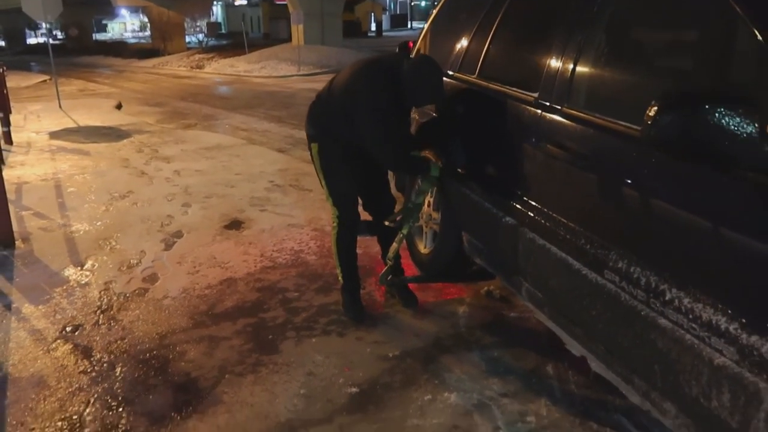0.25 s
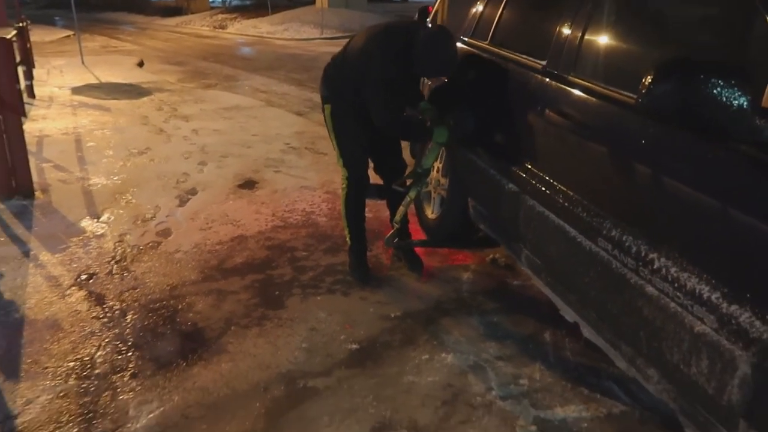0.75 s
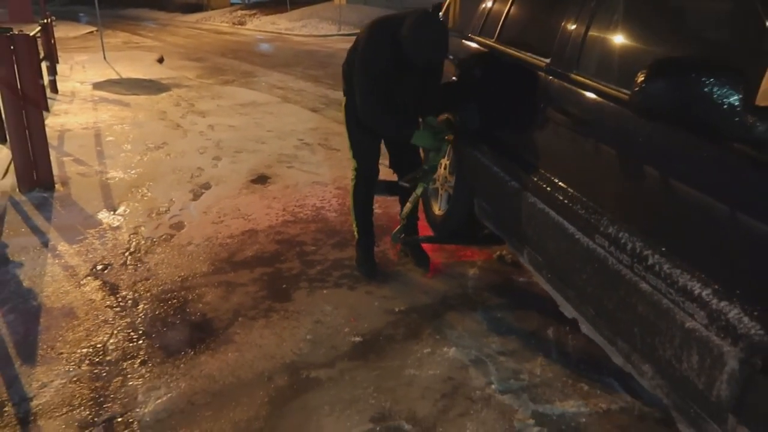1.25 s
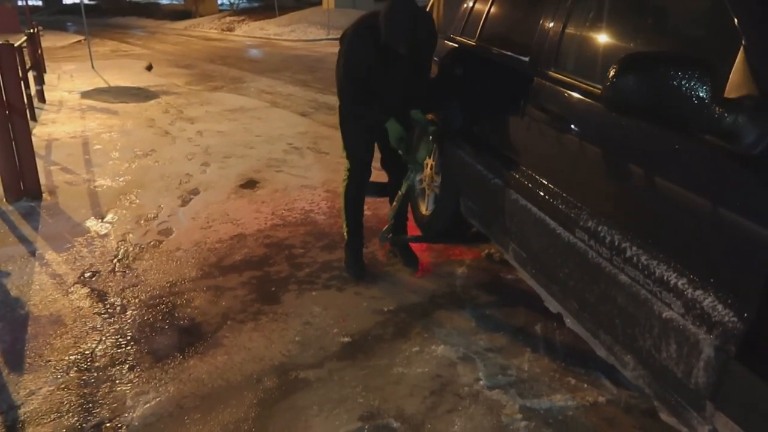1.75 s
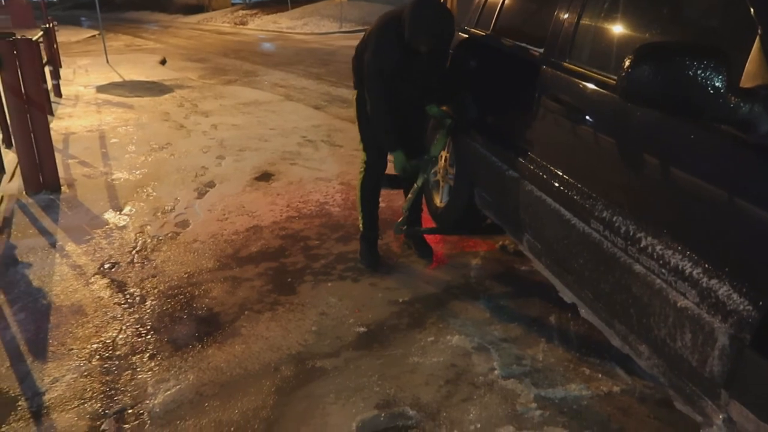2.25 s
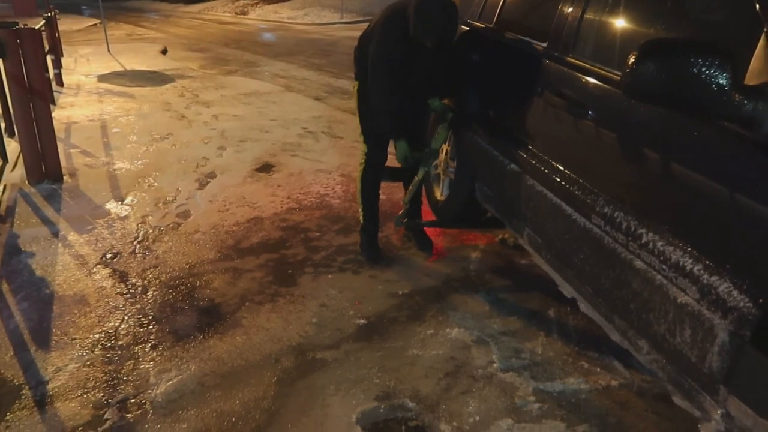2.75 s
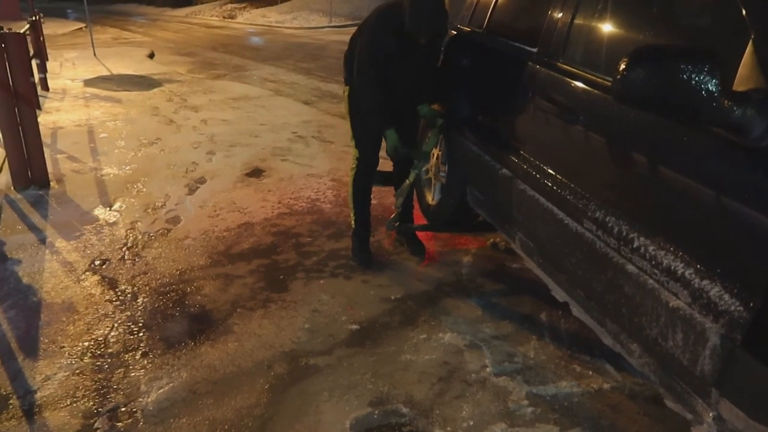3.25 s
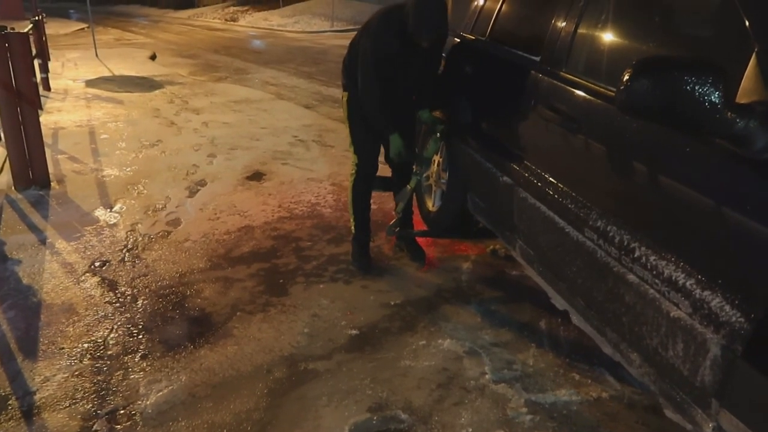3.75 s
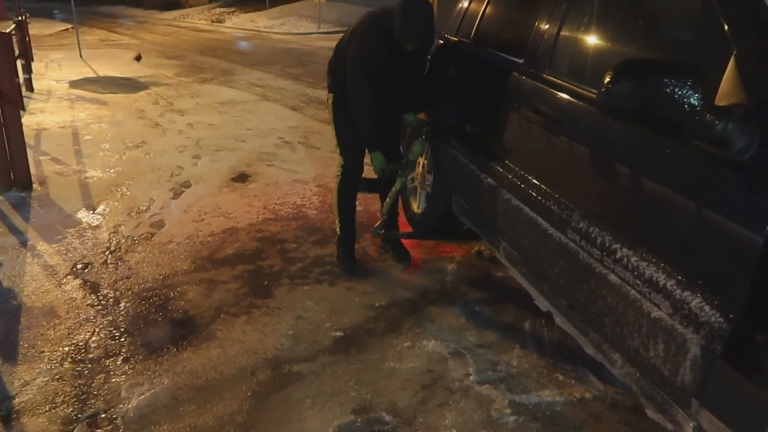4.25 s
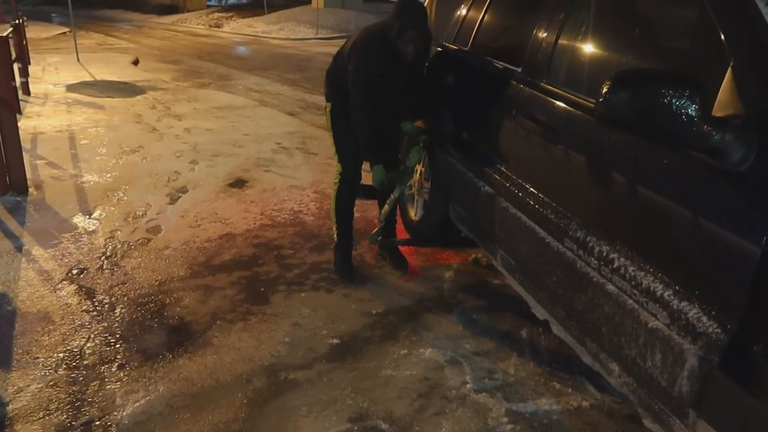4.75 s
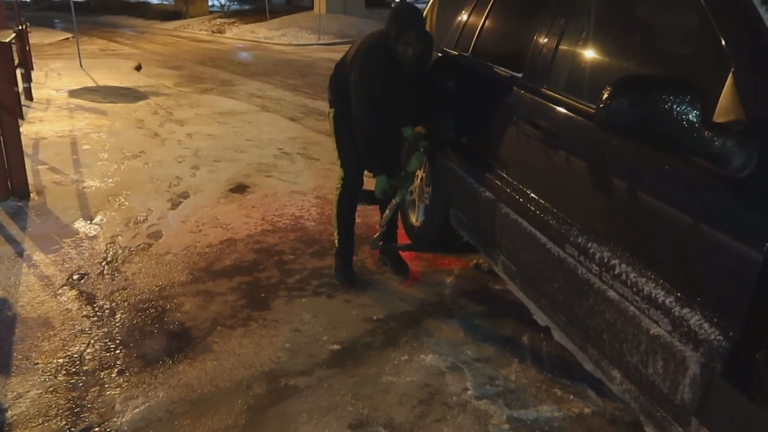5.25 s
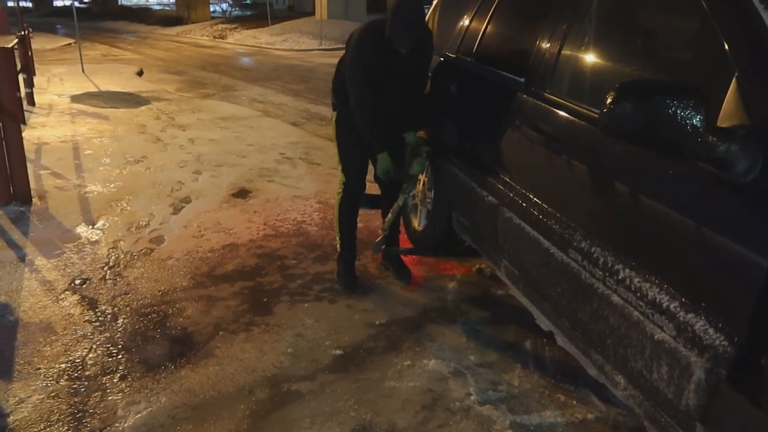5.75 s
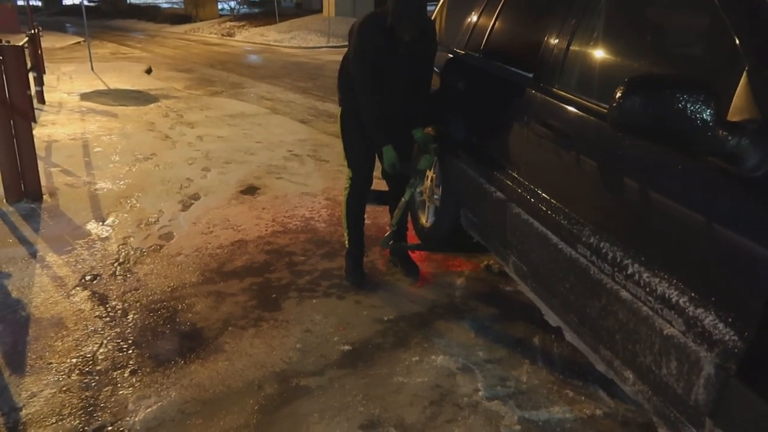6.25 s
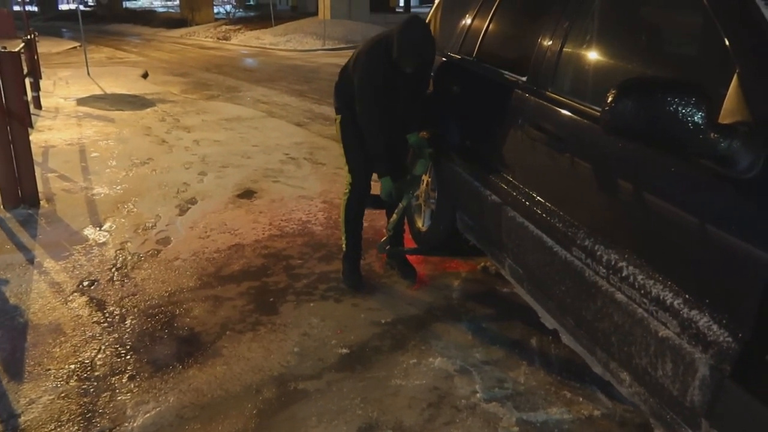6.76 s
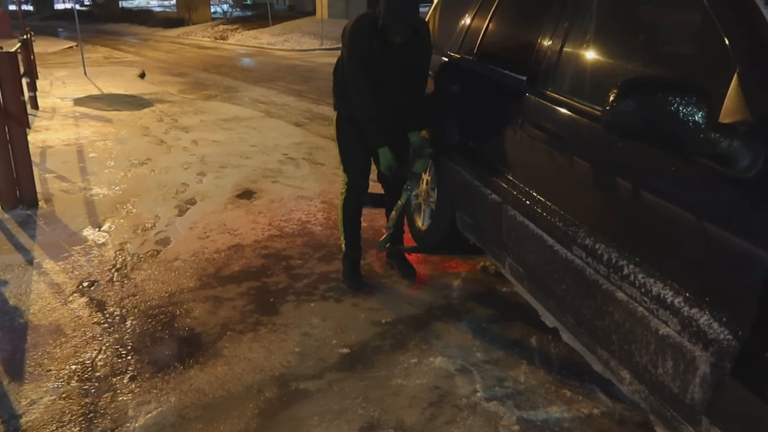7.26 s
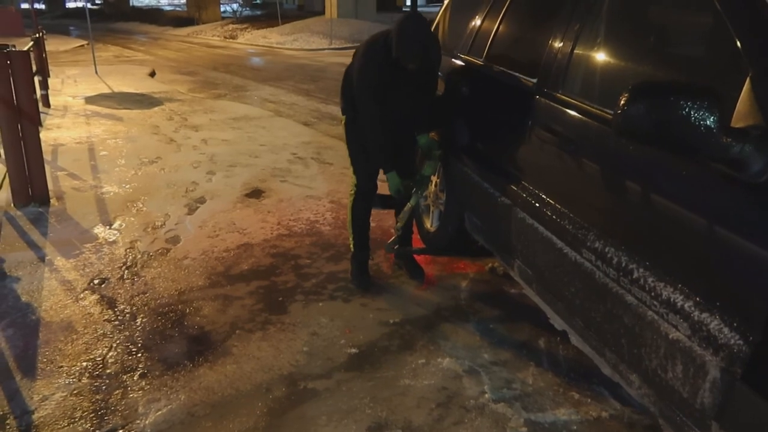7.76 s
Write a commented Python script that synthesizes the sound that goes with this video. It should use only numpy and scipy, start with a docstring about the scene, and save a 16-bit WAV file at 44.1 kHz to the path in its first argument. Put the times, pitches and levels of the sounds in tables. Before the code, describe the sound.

A steel ratchet clicks and rattles as a strap is tightened around a car wheel, with wind buffeting the microphone.

```python
"""Sharp steel snaps and rattles: a ratchet cranks a strap tight round a car wheel, outdoors at night.
The pawl drops behind tooth after tooth, the handle strikes wheel and frame, hooks knock on the rim and
webbing swishes over rubber. Each blow chatters, rings and echoes off car and ground. Gusts buffet the
bare microphone; behind them lie far traffic and a faint motor whine."""
import sys
import numpy as np
from scipy import signal
from scipy.fft import rfft, irfft, next_fast_len
from scipy.io import wavfile
from scipy.ndimage import uniform_filter1d, map_coordinates

SR = 44100
rng = np.random.default_rng(int(sys.argv[2]) if len(sys.argv) > 2 else 0)


def waveform_to_disk(signal):
    """Save audio, clipped to [-1, 1], as 16-bit WAV at the path in sys.argv[1]."""
    frames = np.transpose(np.atleast_2d(signal))
    scaled = np.clip(frames, -1, 1) * 32767
    samples = np.round(scaled).astype(np.int16)
    wavfile.write(sys.argv[1], SR, samples)


N = 353682

# The pawl at the wheel, one drop a stroke: start_s, level_db, ring_db (relative to level_db)
PAWL_DROPS = [(2.1398, -5.5, -6), (2.7855, -8.5, -2), (3.2138, -12.5, 5), (3.7116, -9.5, 2.5),
              (4.246, -10.5, 7), (4.8107, -11, -2.5), (5.347, -10, -1.5), (6.07, -8, -3), (6.778, -12, -4),
              (7.674, -10, -7)]
# Ring of the steel pawl: pitch_hz, level_db, t60_s
PAWL_MODES = [(2760, -33, 0.17), (4177, -10.5, 0.045), (5160, -13, 0.052), (5560, -1, 0.16),
              (5820, -10, .15), (6340, -17.5, .15), (9700, -14.5, 0.049), (9630, -9.5, 0.14),
              (12110, -7.5, 0.097)]
# Crack of steel on steel at the microphone: frequency_hz, density_db
STEEL_SPECTRUM = [(700, -18.5), (1700, -14), (2660, -10), (3700, -9), (6300, -0.5), (9400, -5.5),
                  (10500, -9.5), (15000, -17.5)]
def pawl():
    """The pawl snaps down behind a tooth and rings; the handle rings faintly with it."""
    chatter_ms = 12.3
    blows = [(start_s, level_db, chatter_ms, buckle_ring(pawl_db=ring_db, handle_db=-24.5))
             for start_s, level_db, ring_db in PAWL_DROPS]
    return contacts(blows, STEEL_SPECTRUM, swell=0.018) + jingle(blows, PAWL_MODES)


# The handle against wheel and frame: start_s, level_db, chatter_ms
HANDLE_STOPS = [(1.852, -11.5, 15), (1.8629, -3.5, 6.9), (1.912, -12.5, 7.8), (1.9208, -8.5, 4.4),
                (2.1913, -6.5, 5.3), (2.2023, -9, 2.7), (2.486, -14, 5.5), (2.4964, -6.5, 12.2),
                (2.6492, -20.5, 8.4), (2.6627, -14, 5.8), (2.6895, -16, 1.3), (2.846, -10, 1.9),
                (3.0868, -13, 3.9), (3.4343, -8, 10.5), (3.561, -14.5, 6.2), (3.931, -10.5, 14.7),
                (4.0798, -16.5, 6.2), (4.499, -12.5, 3.6), (4.51, -10, 8.5), (4.631, -18.5, 6.1),
                (5.0434, -8.5, 1.1), (5.0524, -11, 11), (5.715, -12.5, 3.1), (5.7265, -11, 10.7),
                (5.821, -20, 4.3), (6.4326, -13.5, 1.4), (6.4487, -13.5, 11), (7.3273, -13, 11),
                (7.3392, -12, 6.8), (7.6646, -8.5, 4.7)]
# Ring of the steel handle: pitch_hz, level_db, t60_s
HANDLE_MODES = [(2850, -12, 0.21), (3274, -12, 0.39), (6400, -1, 0.21), (6670, -7.5, 0.11),
                (7524, 2.5, 0.062), (8480, -2, 0.032), (12700, -24, .08), (13700, -27.5, .08)]
def handle():
    """The handle strikes wheel and frame, setting itself and the pawl ringing."""
    blows = [(start_s, level_db, chatter_ms, buckle_ring(pawl_db=-11.5, handle_db=-8))
             for start_s, level_db, chatter_ms in HANDLE_STOPS]
    return contacts(blows, STEEL_SPECTRUM, swell=0.19) + jingle(blows, HANDLE_MODES)


# One more handle strike (at 2.9725 s) and, in the other rows, hooks on the wheel rim:
# start_s, level_db, note_db (relative), pitch_hz, chatter_ms
WHEEL_KNOCKS = [(0.0531, -10, -3, 1920, 2.7), (0.1014, -4.5, 3, 1915, 1.57),
                (1.1327, -8.5, -7.5, 1920, 2.04), (1.1823, -12.5, -5, 1900, 2.6),
                (1.202, -6.5, -20, 1390, 2.2), (1.228, -10.5, 0, 1110, 2.9),
                (1.2431, -2.5, -0.5, 1020, 2.2), (1.2506, -3, 3, 925, 5.9), (1.276, -16, 2.5, 1880, 1.5),
                (1.907, -26, -1, 2400, 4.4), (2.7007, -2, -6, 1420, 2.4), (2.8704, -13, -22, 1340, 2.8),
                (2.9725, -9, -27, 2040, 17.2), (3.7433, -10, 0.5, 1500, 1.9)]
# Clack of these blows: frequency_hz, density_db
KNOCK_SPECTRUM = [(500, -27), (900, -5.5), (1600, -6), (3500, -7.5), (5600, -1), (7200, -6), (15000, -27)]
def knocks():
    """Hooks clack on the rim, most with a hollow note; the handle gives a longer chattering steel snap."""
    blows = [(start_s, level_db, chatter_ms, ringing([(hz, note_db - 2, .04)], spread_db=0, waver=0.36))
             for start_s, level_db, note_db, hz, chatter_ms in WHEEL_KNOCKS]
    return contacts(blows, KNOCK_SPECTRUM, echo_db=-4.5, scrapes=False)


# Loose parts of the buckle: start_s, level_db
LOOSE_TICKS = [(0.684, -34), (0.88, -40), (1.1185, -24), (1.172, -30), (1.682, -29), (1.789, -29.5),
               (1.901, -20), (2.068, -33), (2.183, -23), (2.3712, -26), (2.3998, -21), (2.4387, -24.5),
               (2.447, -25.5), (2.527, -26), (2.568, -33), (2.6153, -19.5), (2.728, -31), (2.775, -15.5),
               (2.862, -34), (2.8935, -24), (2.918, -21.5), (2.9305, -17.5), (2.965, -17), (3.007, -22),
               (3.0755, -23), (3.1, -33), (3.1168, -22.5), (3.134, -30), (3.148, -31), (3.196, -31.5),
               (3.3396, -23.5), (3.3608, -36), (3.369, -27), (3.3765, -21), (3.424, -21), (3.527, -22.5),
               (3.554, -27.5), (3.589, -32), (3.6174, -22.5), (3.638, -26.5), (3.648, -33), (3.675, -27),
               (3.6844, -19.5), (3.7637, -28), (3.818, -23), (3.8564, -22.5), (3.87, -33), (3.901, -33),
               (3.917, -22.5), (3.973, -30), (4.0001, -28.5), (4.067, -23.5), (4.162, -34.5),
               (4.365, -34.5), (4.4159, -27), (4.427, -26), (4.4886, -25), (4.6159, -34), (4.727, -38),
               (4.908, -36), (4.922, -26), (4.9617, -26), (4.981, -25), (5.033, -25), (5.132, -37),
               (5.1542, -19.5), (5.495, -38.5), (5.5886, -35), (5.6055, -30), (5.635, -31.5), (5.703, -26),
               (5.81, -35), (6.211, -33.5), (6.3153, -27), (6.346, -33.5), (6.5316, -27), (6.64, -31.5),
               (7.2367, -26), (7.2555, -26.5), (7.316, -21), (7.4058, -21.5), (7.81, -34), (7.819, -34),
               (7.83, -28.5)]
# Light contacts and after-ring: frequency_hz, density_db
LIGHT_SPECTRUM = [(1200, -17), (2800, -10.5), (6200, -6.5), (10000, -15), (15000, -29)]
def loose_parts():
    """Loose steel ticks, and the loaded buckle creeps in four faint ticks before each pawl drop."""
    creep = [(drop_s - rng.uniform(.07, .15), rng.normal(-44, 3))
             for drop_s, *_ in PAWL_DROPS for _ in range(4)]
    blows = []
    for start_s, level_db in [*LOOSE_TICKS, *creep]:
        chatter_ms = 3.46 * amp(rng.normal(0, 4))
        tones = amp(-14) * ringing(PAWL_MODES + HANDLE_MODES, spread_db=5, waver=0.25)
        blows.append((start_s, level_db, chatter_ms, tones))
    return contacts(blows, LIGHT_SPECTRUM) + jingle(blows, HANDLE_MODES)


def buckle_ring(pawl_db, handle_db):
    """One blow rings both steel parts of the buckle."""
    pawl_tones = amp(pawl_db) * ringing(PAWL_MODES, spread_db=2.5, waver=0.13)
    return pawl_tones + amp(handle_db) * ringing(HANDLE_MODES, spread_db=2.5, waver=0.19)


def ringing(modes, spread_db, waver):
    """Modes ring at new strengths each blow; loose contact shifts each phase by about waver turns a step."""
    t = np.arange(SR // 12) / SR
    steps_s = np.linspace(0, .2, 80)
    tones = np.zeros(len(t))
    for hz, level_db, t60_s in modes:
        decay = amp(level_db + rng.normal(0, spread_db) - 60 * t / t60_s)
        drift = rng.random() + np.cumsum(rng.normal(0, waver, len(steps_s)))
        tones += decay * np.sin(2 * np.pi * (hz * t + np.interp(t, steps_s, drift)))
    return tones


def contacts(blows, spectrum, swell=0, echo_db=0, scrapes=True):
    """Blows build over a share (swell) of their chatter time, then echo off car and ground."""
    power, ring = np.zeros((2, N + SR))
    t = np.arange(SR // 5) / SR
    lead_s = np.arange(-SR // 50, 0) / SR
    echoes = (1 - np.exp(-t / 0.0023)) * amp(-2.5 - 60 * t / 0.071)
    for start_s, level_db, chatter_ms, tones in blows:
        at = round(start_s * SR)
        attack = 1 - np.exp(-t / (0.00017 + swell * chatter_ms / 1000))
        chatter = attack * np.exp(-(t * 1000 / chatter_ms) ** 2)
        power[at:at + len(t)] += (amp(level_db - 6) * (chatter + amp(echo_db) * echoes)) ** 2
        if scrapes:  # a brief scrape leads into the blow
            power[at - len(lead_s):at] += amp(level_db - 20 + 60 * lead_s / .024) ** 2
        ring[at:at + len(tones)] += amp(level_db) * (chatter + 0.53 * echoes)[:len(tones)] * tones
    grit = amp(2.57 * wobble(700))  # many tiny re-contacts
    crackle = unit(grit * patchy(noise(spectrum), depth_db=1.5, frames=5))
    return np.sqrt(power[:N]) * crackle + ring[:N]


def jingle(blows, modes, below_db=31.5, t60_s=.37):
    """The struck part keeps jingling weakly, in fuzzy bands at its modes."""
    power = np.zeros(N + SR)
    t = np.arange(SR // 5) / SR
    for start_s, level_db, *_ in blows:
        at = round(start_s * SR)
        power[at:at + len(t)] += amp(level_db - below_db - 60 * t / t60_s) ** 2
    bands = lambda f: .25 + sum(amp(db / 4) * peak(f, hz, width_hz=140) for hz, db, _ in modes)
    shimmer = patchy(filtered(noise(LIGHT_SPECTRUM), bands), depth_db=2.5, frames=36)
    return np.sqrt(power[:N]) * shimmer


# The strap sliding on the tyre: middle_s, half_length_s, level_db
STRAP_DRAGS = [(0.736, 0.15, -50.5), (1.3, 0.094, -43.5)]
# Swish of the webbing: frequency_hz, density_db
WEBBING_SPECTRUM = [(1500, -19), (4000, -9), (6000, 1), (8000, -9), (12000, -26)]
def strap():
    """Webbing slides over rubber in short grainy swishes."""
    t = np.arange(N) / SR
    level = sum(amp(db - 10 * ((t - middle_s) / half_s) ** 2) for middle_s, half_s, db in STRAP_DRAGS)
    grain = amp(2.5 * wobble(60))
    return level * unit(grain * patchy(noise(WEBBING_SPECTRUM), depth_db=3.5, frames=8))


# Puffs right on the bare microphone: middle_s, half_length_s, slow_eddies_db, fast_eddies_db
WIND_PUFFS = [(0.064, 0.063, -21.5, -30.5), (0.374, 0.27, -18, -30.5), (0.741, 0.075, -14.5, -31),
              (0.99, 0.19, -21, -42), (1.196, .08, -12, -26), (1.447, 0.039, -11.5, -25),
              (1.6, 0.075, -16.5, -32.5), (1.804, 0.078, -19, -38.5), (2.081, 0.087, -19, -19.5),
              (2.79, .14, -21, -29.5), (2.916, 0.057, -26, -22.5), (3.165, 0.05, -23, -28),
              (3.583, 0.15, -23.5, -29), (3.977, .13, -25.5, -32), (4.105, 0.056, -43, -27),
              (4.316, 0.13, -26.5, -32.5), (4.498, .06, -12, -18), (4.677, 0.091, -16, -15),
              (4.96, 0.35, -15.5, -18), (5.21, 0.089, -19, -22), (5.375, .1, -15.5, -17),
              (5.666, 0.23, -14.5, -26.5), (6.038, 0.09, -20.5, -29), (6.327, .12, -9.5, -19),
              (6.493, .04, -14, -23.5), (6.601, 0.052, -9, -22), (6.748, 0.059, -16, -25.5),
              (7.048, 0.22, -15.5, -26.5), (7.43, 0.083, -22, -20.5), (7.56, 0.032, -32, -22),
              (7.673, 0.035, -25.5, -40.5), (7.862, 0.057, -19.5, -21), (7.994, 0.059, -22, -31)]
def puffs(column, fade_db, calm_db):
    """Eddy level in dB: puffs swell out of the calm, fade_db down at half a length from their middle."""
    t = np.arange(0, N / SR + .01, .005)
    power = sum(amp(row[column] - fade_db * ((t - row[0]) / row[1]) ** 2) ** 2 for row in WIND_PUFFS)
    return np.interp(np.arange(N) / SR, t, 10 * np.log10(amp(calm_db) ** 2 + power))


# Rumble of slow eddies at the microphone port: frequency_hz, density_db
SLOW_EDDIES = [(12, -7), (30, -4), (60, -1), (110, -7.5), (200, -26.5), (500, -88.5)]
# Fast eddies there in a light breeze: frequency_hz, density_db
FAST_EDDIES = [(70, -13), (130, 3.5), (180, -1), (280, -16), (600, -40.5), (1400, -78)]
# Rough edge of strong puffs: frequency_hz, density_db
FLUTTER_SPECTRUM = [(150, -16.5), (350, 3), (700, -2.5), (1100, -16.5), (2500, -46.5)]
def wind():
    """Eddies roll over the microphone port one after another, slow and fast ones in shared lumps."""
    slow_db = puffs(column=2, fade_db=13, calm_db=-34.5)
    fast_db = puffs(column=3, fade_db=13.5, calm_db=-49.5)
    flutter_db = -39 + 1.3 * (slow_db + 12.5)
    # a lasting gust sheds quicker eddies
    gust = np.clip((uniform_filter1d(fast_db, size=SR // 2) + 33.5) / 14, 0, 1)
    eddies = np.sqrt(1 - gust) * noise(FAST_EDDIES)
    eddies += np.sqrt(gust) * noise(np.multiply(FAST_EDDIES, (1.5, 1)))
    even_out = lambda x: x / np.sqrt(np.abs(uniform_filter1d(x ** 2, size=SR // 12)) + 0.039)
    lumps = wobble(25)
    slow = unit(amp(3.63 * lumps) * even_out(noise(SLOW_EDDIES)))
    fast = unit(amp(1.23 * lumps + 4.4 * wobble(50)) * even_out(eddies))
    flutter = unit(amp(2.6 * lumps + 3.6 * wobble(60)) * noise(FLUTTER_SPECTRUM))
    return amp(slow_db) * slow + amp(fast_db) * fast + amp(flutter_db) * flutter


# Rise and fall of the far street: time_s, drone_db (relative), hiss_db
STREET_LEVELS = [(0, -40, -53.5), (.45, -40, -54.5), (.9, -36.5, -53.5), (1.3, -36, -52.5), (2, -38, -52.5),
                 (2.8, -43.5, -48.5), (3.6, -44, -51), (4.3, -46, -52.5), (5.4, -49, -61),
                 (6.3, -45.5, -59.5), (7, -47.5, -63.5), (8.02, -43, -55.5)]
# Drone of traffic from a distance: frequency_hz, density_db
DRONE_SPECTRUM = [(150, 4.5), (400, 0.5), (600, 1.5), (1200, 3.5), (1600, -4.5), (2900, -16.5),
                  (6000, -44.5)]
# Treble hiss above it: frequency_hz, density_db
HISS_SPECTRUM = [(1500, -8.5), (3200, -5.5), (6000, -2.5), (9500, -15.5), (15000, -25.5)]
def traffic():
    """Far traffic drones and hisses, its level wavering slightly."""
    times_s, *levels = np.transpose(STREET_LEVELS)
    drone_db, hiss_db = (np.interp(np.arange(N) / SR, times_s, db) for db in levels)
    drone = amp(drone_db - 2 + 0.33 * wobble(9.2)) * noise(DRONE_SPECTRUM)
    return drone + amp(hiss_db + wobble(6.3)) * noise(HISS_SPECTRUM)


# A faint motor in the background: pitch_hz, width_hz, level_db
MOTOR_TONES = [(611.5, 54, -57), (760.4, 24, -52.5), (848, 17, -60.5), (1231, 44, -55.5)]
def motor():
    """A motor whines in steady fuzzy tones, each a narrow band of noise."""
    return sum(amp(level_db) * unit(filtered(rng.standard_normal(N), lambda f: peak(f, hz, width_hz)))
               for hz, width_hz, level_db in MOTOR_TONES)


def amp(db):
    return 10 ** (np.asarray(db) / 20)


def unit(x):
    return x / np.sqrt(np.mean(x ** 2) + 1e-20)


def peak(f, centre_hz, width_hz):
    return 1 / (1 + (2 * (f - centre_hz) / width_hz) ** 2)


def wobble(rate):
    """A smooth random curve, rate knots a second."""
    return map_coordinates(rng.standard_normal(int(N * rate / SR) + 4), [np.arange(N) * rate / SR])


def filtered(x, response):
    """x shaped by a gain that depends on frequency."""
    size = next_fast_len(N + 8192)
    return irfft(rfft(x, size) * response(np.fft.rfftfreq(size, 1 / SR)), size)[..., :N]


def noise(spectrum):
    """Noise of rms 1, its spectrum points joined on a log frequency axis."""
    hz, db = np.transpose(spectrum)
    return unit(filtered(rng.standard_normal(N), lambda f: amp(np.interp(np.log(f + 1), np.log(hz), db))))


def patchy(x, depth_db, frames):
    """x with patches of random gain, some 500 Hz wide and frames times 6 ms long."""
    spectra = signal.stft(x, nperseg=512)[2]
    patches = uniform_filter1d(rng.standard_normal(spectra.shape), size=6, axis=0)
    patches = uniform_filter1d(patches, size=frames, axis=1)
    return unit(signal.istft(spectra * amp(depth_db * unit(patches)), nperseg=512)[1][:N])


def scene():
    """The work at the wheel, the wind and the far street, all at one microphone."""
    ratchet = pawl() + handle() + knocks() + loose_parts()
    return (ratchet + strap() + wind() + traffic() + motor())[None]


def record(dry, ceiling=.98, top_hz=15700):
    """The loudest snaps clip softly, and the treble is cut steeply above top_hz."""
    clipped = dry / (1 + np.abs(dry / ceiling) ** 8) ** (1 / 8)
    return filtered(clipped, lambda hz: 1 / (1 + (hz / top_hz) ** 120))


dry = scene()
out = record(dry)
waveform_to_disk(out)
```